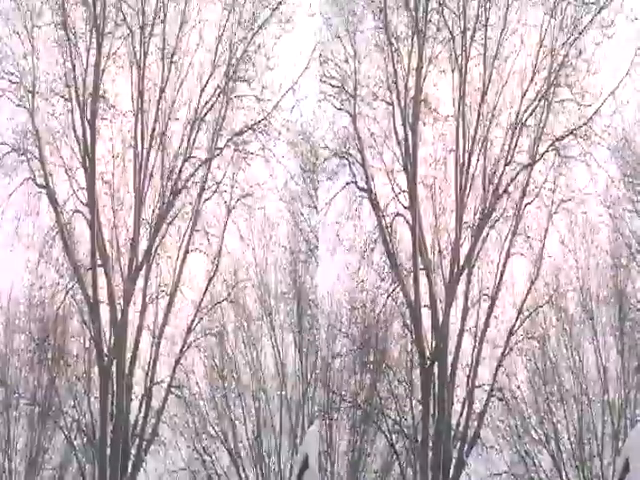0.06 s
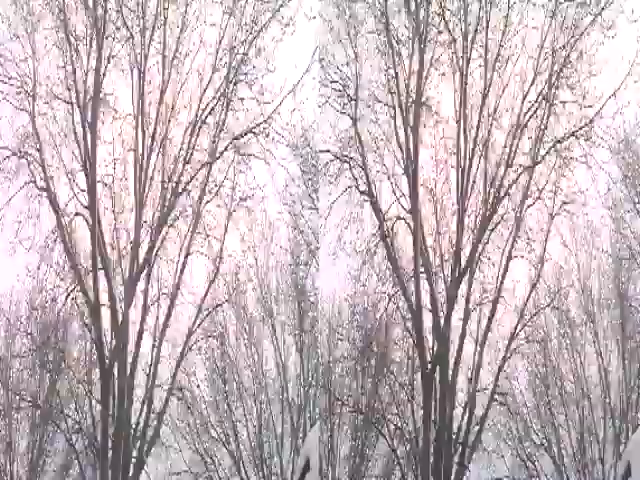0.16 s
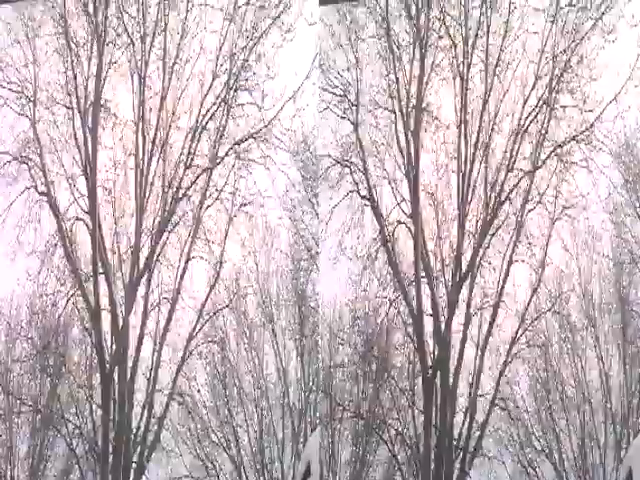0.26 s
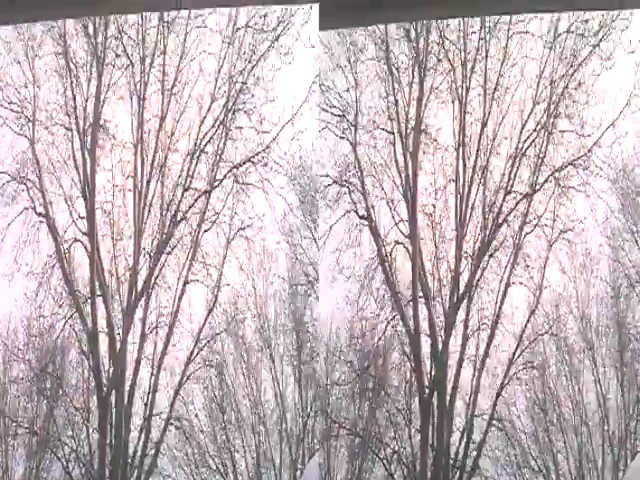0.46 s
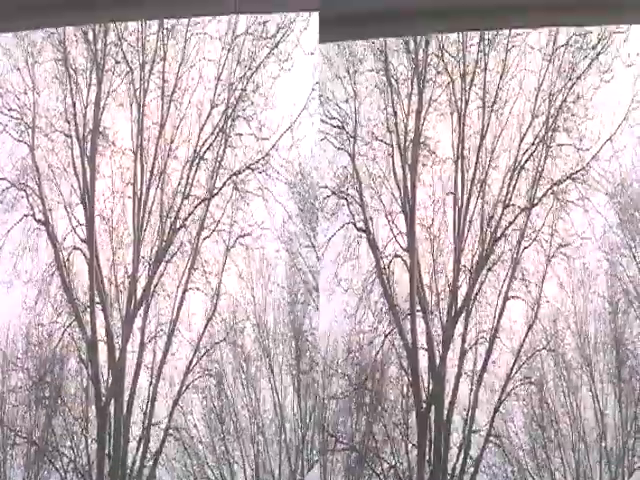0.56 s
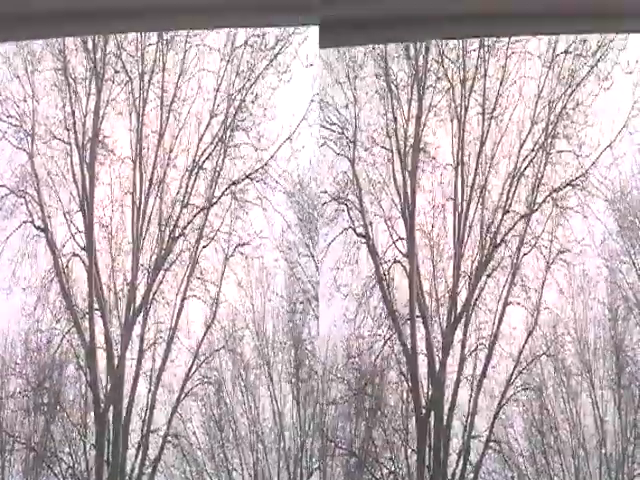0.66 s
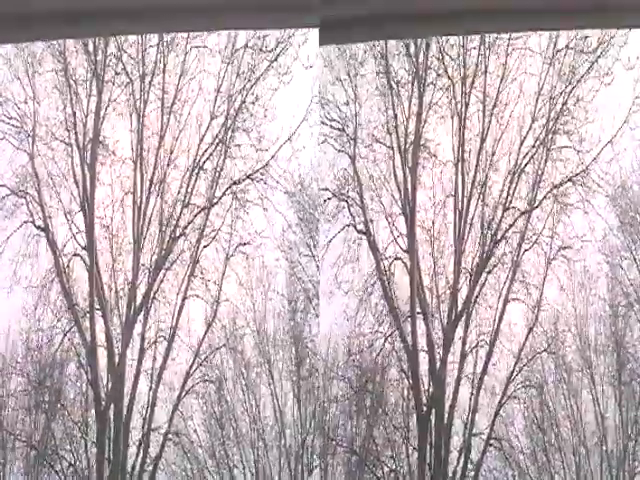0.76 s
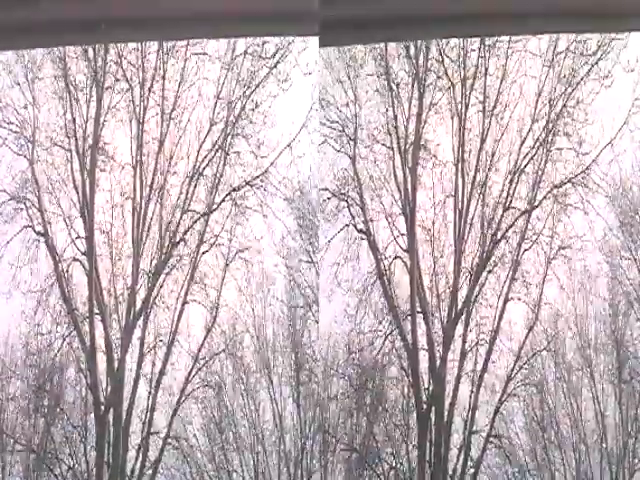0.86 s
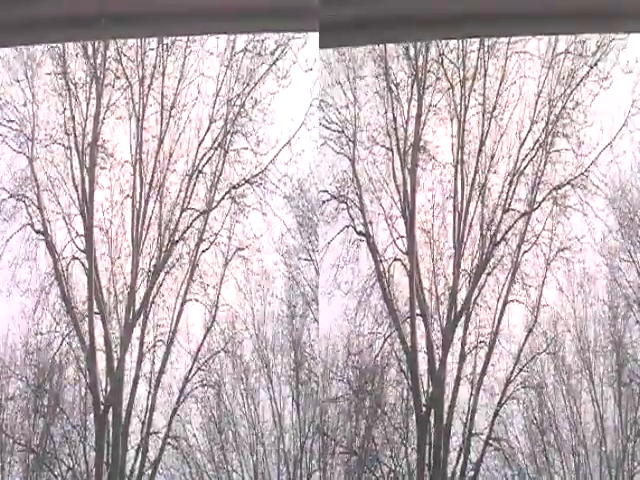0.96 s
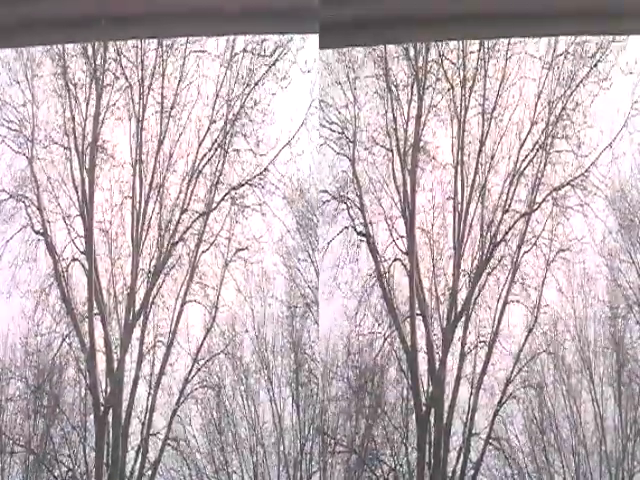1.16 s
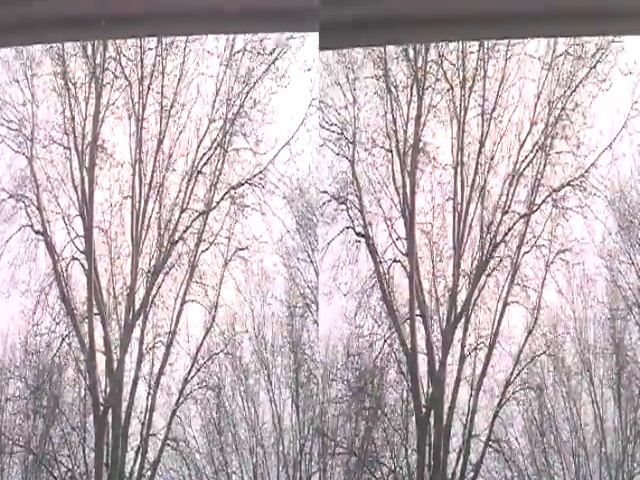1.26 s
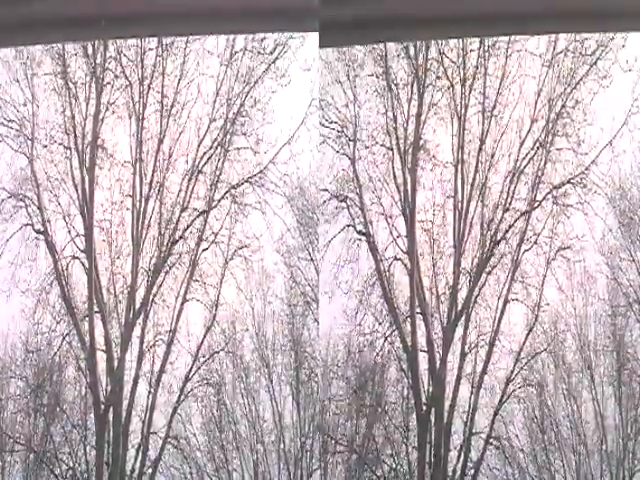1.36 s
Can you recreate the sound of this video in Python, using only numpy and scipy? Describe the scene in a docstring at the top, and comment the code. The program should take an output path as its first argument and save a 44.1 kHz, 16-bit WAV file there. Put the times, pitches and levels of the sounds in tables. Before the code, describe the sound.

Handling noise on a camera: one sharp plastic snap, then light ticks and soft knocks.

```python
"""Hand-held camera handling noise

Soft knocks, one hard plastic snap and two bright ticks. Each is a blow and a scuff that ring the
casing for a few milliseconds, with a small thump. A very low, quickly fading swing follows the snap.
Behind them: low rumble, faint hum, soft air, microphone hiss, a thin whine and tiny creaks."""
import sys
import numpy as np
from scipy import signal
from scipy.fft import rfft, irfft
from scipy.io import wavfile
from scipy.ndimage import uniform_filter1d

SR = 44100
rng = np.random.default_rng(int(sys.argv[2]) if len(sys.argv) > 2 else 0)


def store_pcm(level_fs):
    """Save levels as 16-bit WAV."""
    pcm = np.round(np.clip(level_fs, -1, 1) * 32767).astype(np.int16)
    wavfile.write(sys.argv[1], SR, np.atleast_2d(pcm).T)


N = 61739
TIME_S = np.arange(N) / SR

# snap contact: start_s, level_db, tilt_db_per_octave, body_db, thump_db, scuff_s
SNAP_CONTACT = [(0.2061, -10, 1.97, 1, -22.5, .0014)]


def undb(db):
    """Decibels to gain."""
    return 10 ** (np.asarray(db) / 20)


def unit(x):
    """Scale to rms 1."""
    return x / np.sqrt(np.mean(x ** 2))


def bins_hz():
    """FFT bin frequencies, floored at 1 Hz."""
    return np.maximum(np.arange(N // 2 + 1) * SR / N, 1)


def noise(spectrum):
    """Noise of rms 1 shaped by rows of freq_hz, level_db."""
    hz, db = np.array(spectrum, float).T
    gain = undb(np.interp(np.log(bins_hz()), np.log(hz), db))
    return unit(irfft(rfft(rng.standard_normal(N)) * gain, N))


def drift(rate_hz):
    """Slow random drift of rms 1."""
    hold = int(SR / rate_hz)
    steps = np.repeat(rng.standard_normal(N // hold + 1), hold)
    return unit(uniform_filter1d(steps, hold)[:N])


def ring(modes, lag_at_1khz_s=.00072):
    """Causal response of a small resonant part; bending waves carry the treble first."""
    f = bins_hz()
    power = sum(undb(db) ** 2 / (1 + ((f * f - hz * hz) / (f * width_hz)) ** 2) ** 2
                for hz, width_hz, db in modes)
    cepstrum = irfft(np.log(power + 1e-5), N)[:N // 2]  # minimum phase
    cepstrum[0] /= 2
    bend_cycles = 2 * lag_at_1khz_s * np.sqrt(1000 * f)
    return np.exp(rfft(cepstrum, N) - 2j * np.pi * bend_cycles)


def taps(contacts, modes, scuff, thump_hz, thump_decay_s, thump_pan_db, landing=0):
    """A blow and a scuff ring the part; each contact adds a low thump. Stereo."""
    f, response = bins_hz(), ring(modes)
    body_band = np.exp(-.5 * (np.log2(f / 900) / .45) ** 2)  # woody tone of a fuller contact
    octaves = np.log2(np.maximum(f, 500) / 2000)
    rub = landing * np.exp(-TIME_S[::-1] / .002)  # contact closing; wraps to just before the blow
    pan_db = thump_pan_db * np.array([[.5], [-.5]])
    out = np.zeros((2, N))
    for start_s, level_db, tilt_db_per_octave, body_db, thump_db, scuff_s in contacts:
        grit = rng.standard_normal(N) * (np.exp(-TIME_S / scuff_s) + rub)
        force = scuff * grit / np.linalg.norm(grit)
        force[0] += 1  # the blow
        colour = undb(tilt_db_per_octave * octaves + body_db * body_band)
        delay = np.exp(-2j * np.pi * f * start_s)
        hit = irfft(rfft(force) * response * colour * delay, N)
        out += undb(level_db) * hit / np.linalg.norm(hit) * np.sqrt(.01 * SR)  # energy over 10 ms
        age_s = np.maximum(TIME_S - start_s, 0)
        envelope = np.e * np.exp(-age_s / thump_decay_s) * (1 - np.exp(-age_s / .0003))
        out += undb(thump_db + pan_db) * envelope * np.sin(2 * np.pi * thump_hz * age_s)
    return out


def rumble():
    """Low noise that swells and sinks."""
    spectrum = [(8, 0.5), (18, 3), (30, 1), (60, -6), (85, -10.5), (125, -15.5), (170, -19.5), (240, -23.5),
                (330, -37.5), (500, -65)]  # rumble colour: freq_hz, level_db
    swells = [(0, -48), (.08, -42.5), (.15, -46.5), (.25, -38), (.33, -43), (.42, -48.5), (.56, -42),
              (.67, -41.5), (.74, -47.5), (.96, -42), (1.22, -48.5), (1.31, -47), (1.4, -46.5)]  # envelope: time_s, level_db
    level_db = np.interp(TIME_S, *np.array(swells).T)
    return noise(spectrum) * undb(level_db + 1.2 * drift(21))


def hum():
    """Two low partials wavering in level and phase."""
    partials = [(59.5, -53.5), (119, -67)]  # hum tones: pitch_hz, level_db
    out = np.zeros(N)
    for pitch_hz, level_db in partials:
        gain = undb(level_db + 1.5 * drift(16))
        phase = 2 * np.pi * (pitch_hz * TIME_S + rng.random()) + .54 * drift(9.6)
        out += gain * unit(np.sin(phase))
    return out


def air():
    """Soft, slightly wavering broadband noise."""
    spectrum = [(200, -6), (300, 0.5), (400, -1), (480, -8), (560, -11), (800, -14.5), (1600, -19.5),
                (2500, -22.5), (3800, -24.5), (6000, -27), (9000, -27), (13000, -29.5), (15500, -32)]  # air colour: freq_hz, level_db
    low_cut = signal.butter(2, 265, "high", fs=SR, output="sos")
    return unit(signal.sosfilt(low_cut, noise(spectrum))) * undb(-61.5 + .5 * drift(21))


def whine(pitch_hz=14723):
    """Thin steady tone, mostly left."""
    tone = undb(-78) * unit(np.sin(2 * np.pi * pitch_hz * TIME_S + .5 * drift(25)))
    return np.array([tone, .15 * tone])


def microphone_hiss():
    """Hiss in opposite polarity on the two channels; widens the treble."""
    spectrum = [(40, -28.5), (100, 1), (350, 4.5), (1200, 0), (2200, -9.5), (5000, -6), (9000, 1),
                (15500, 1)]  # hiss colour: freq_hz, level_db
    side = undb(-69) * noise(spectrum)
    return np.array([side, -side])


def rustle(creaks_per_s=89, level_db=-71):
    """Faint patter of tiny random creaks."""
    modes = [(1500, 1500, -10), (3800, 1800, -2.5), (8500, 4000, -9)]  # creak resonances: freq_hz, width_hz, level_db
    onsets = (rng.random(N) < creaks_per_s / SR) * rng.uniform(.17, 1, N)
    envelope = signal.fftconvolve(onsets, np.hanning(N // 150))[:N]
    creaks = envelope * rng.standard_normal(N)
    return undb(level_db) * unit(irfft(rfft(creaks) * ring(modes), N) + 1e-12)


def knocks():
    """Soft, scuffing contacts ring the casing."""
    # knocks: start_s, level_db, tilt_db_per_octave, body_db, thump_db, scuff_s
    contacts = [(0.0751, -48.5, -0.5, 4, -34.5, 0.0071), (0.1995, -55.5, 3, -2.5, -61, 0.003),
                (0.2461, -48.5, -1.1, 2, -51, .0025), (0.3152, -48, 0, -3, -37, 0.0054),
                (0.3307, -50, -0.5, -11, -35, 0.0035), (0.4511, -60, 1.5, -10, -43, .002),
                (0.4567, -56, 0.6, -13, -46, .003), (0.5971, -62.5, 8, -13, -38.5, .0015),
                (0.6025, -57.5, -1.8, -20, -58, 0.0017), (0.6162, -55, -2, 1.5, -38, .003),
                (0.6577, -48.5, 2.9, 7.5, -37, 0.0037), (0.8927, -50.5, 1.1, -8.5, -36.5, 0.0014)]
    modes = [(550, 320, -6), (805, 390, -1), (1010, 260, 0), (1450, 200, -0.5), (2060, 695, -9),
             (2680, 820, -9.5), (3350, 620, -6), (4000, 800, -8.5), (4650, 570, -11.5), (5550, 1300, -8),
             (6700, 1000, -21), (7800, 1300, -18.5), (9100, 780, -12.5), (11500, 4500, -31.5)]  # casing resonances: freq_hz, width_hz, level_db
    return taps(contacts, modes, scuff=1, thump_hz=69.6, thump_decay_s=.0023, thump_pan_db=1.6,
                landing=.11)


def snap():
    """One hard blow on plastic, almost free of scuff."""
    modes = [(856, 260, -2.5), (1157, 520, -6), (1820, 460, -6), (2210, 640, -2), (2850, 770, -5.5),
             (3390, 720, 0), (4953, 1300, -6), (5835, 1900, -6.5), (7435, 1800, -4.5), (8220, 1300, -5),
             (9600, 1700, -7.5), (11200, 1100, -9.5), (11800, 900, -20), (14840, 1500, -13.5)]  # plastic resonances: freq_hz, width_hz, level_db
    return taps(SNAP_CONTACT, modes, scuff=.09, thump_hz=83, thump_decay_s=.0016, thump_pan_db=3)


def low_sway(sway_hz=25, decay_s=.057):
    """A very low, quickly fading swing follows the snap."""
    age_s = np.maximum(TIME_S - SNAP_CONTACT[0][0], 0)
    envelope = (1 - np.exp(-age_s * sway_hz * 4)) * np.exp(-age_s / decay_s)
    return -undb(-26.5) * envelope * np.sin(2 * np.pi * sway_hz * age_s)


def ticks():
    """Two light contacts ring mainly high resonances."""
    # ticks: start_s, level_db, tilt_db_per_octave, body_db, thump_db, scuff_s
    contacts = [(0.3388, -34, 0.2, 4.5, -48.5, 0.00098), (0.7768, -42.5, 1.5, -2.5, -49, 0.0015)]
    modes = [(640, 540, -12), (1490, 500, -7.5), (3150, 700, -7.5), (4200, 670, -9.5), (5480, 2100, -6),
             (6750, 660, -7), (9390, 1370, 1.5), (11300, 1800, -20), (12500, 1500, -10), (14400, 1300, -9)]  # tick resonances: freq_hz, width_hz, level_db
    return taps(contacts, modes, scuff=.36, thump_hz=78.4, thump_decay_s=.0072, thump_pan_db=1.5)


def reflections(direct, level_db=-39.5, decay_s=.028):
    """Faint tail from nearby surfaces."""
    spectrum = [(200, -10), (700, 5.5), (1500, 0), (3500, -1.5), (7000, -10), (15000, -26)]  # tail colour: freq_hz, level_db
    impulse = noise(spectrum) + .3 * np.array([noise(spectrum), noise(spectrum)])
    impulse *= np.exp(-TIME_S / decay_s)
    impulse /= np.linalg.norm(impulse[0])
    return undb(level_db) * signal.fftconvolve(direct, impulse, axes=1)[:, :N]


def scene():
    """Handling sounds over the background; they reach the left microphone port just after the right."""
    left_lag_s = 23e-6
    handling = snap() + ticks() + knocks() + rustle()
    left, right = handling + reflections(handling)
    left = irfft(rfft(left) * np.exp(-2j * np.pi * bins_hz() * left_lag_s), N)
    background = rumble() + hum() + air() + whine() + microphone_hiss()
    return np.array([left, right]) + low_sway() + background


def record(dry):
    """Clip at full scale, then low-pass at 15.9 kHz."""
    low_pass = signal.ellip(8, .2, 70, 15900, fs=SR, output="sos")
    return signal.sosfilt(low_pass, np.clip(dry, -1, 1))


dry = scene()
out = record(dry)
store_pcm(out)
```